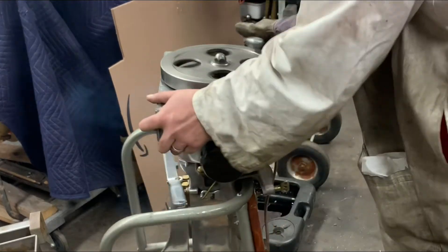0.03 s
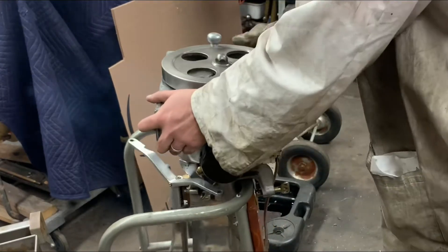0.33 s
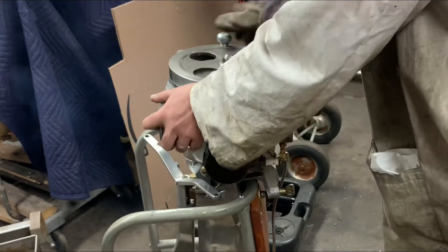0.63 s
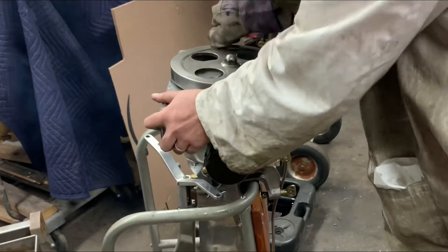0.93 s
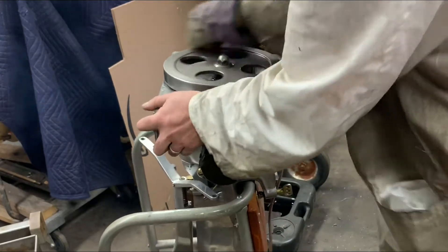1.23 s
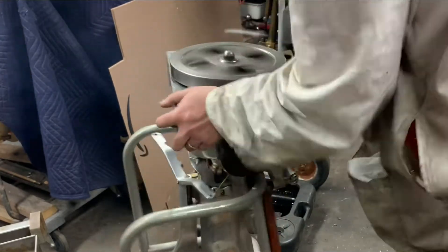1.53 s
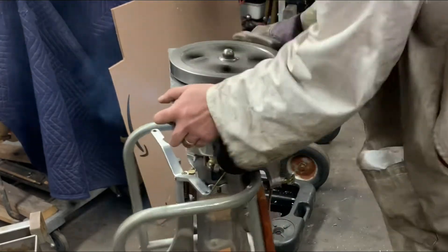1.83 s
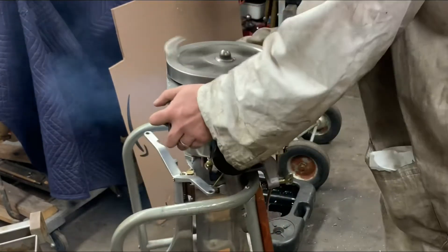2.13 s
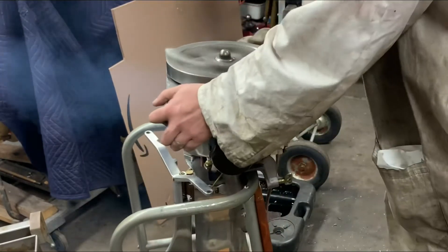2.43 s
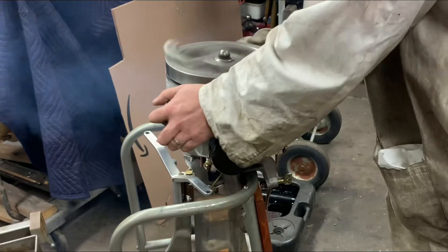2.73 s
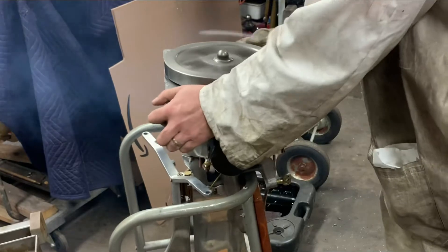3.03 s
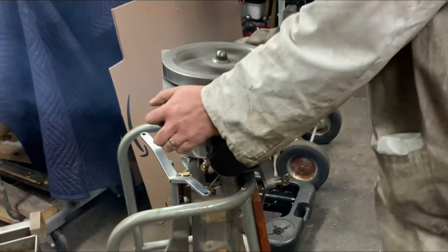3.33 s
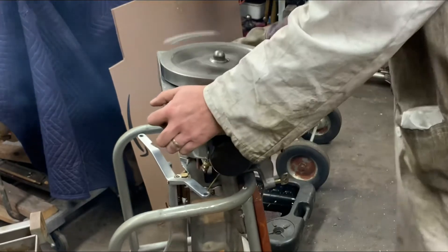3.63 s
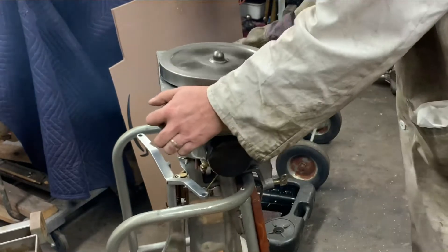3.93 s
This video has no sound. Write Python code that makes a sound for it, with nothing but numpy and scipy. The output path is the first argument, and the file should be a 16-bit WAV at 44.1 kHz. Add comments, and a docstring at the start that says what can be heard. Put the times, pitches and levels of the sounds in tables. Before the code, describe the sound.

A small old outboard engine is cranked by hand, catches and runs with sharp pops.

```python
"""Hand-starting an antique outboard.

A single-cylinder engine is rocked by hand in a workshop: air puffs through the ports, loose steel clinks,
a glove knocks on the knob. After one hard swing it catches and settles at about eleven pops a second.
Each pop is a crack of gas plus a ring of the exhaust, which echoes off near walls and booms in the room."""
import sys
import numpy as np
from scipy import signal
from scipy.fft import rfft, irfft, next_fast_len
from scipy.io import wavfile
from scipy.ndimage import uniform_filter1d, minimum_filter1d, map_coordinates

SR = 44100
rng = np.random.default_rng(int(sys.argv[2]) if len(sys.argv) > 2 else 0)


def digitize_waveform(pressure):
    """Quantize a signal to 16-bit integers and store it at the path in sys.argv[1].

    Rows of a 2-D input are taken as channels; values are limited to [-1, 1].
    """
    field = np.atleast_2d(pressure).T
    bounded = np.clip(field, -1, 1)
    quanta = np.round(bounded * 32767).astype(np.int16)
    wavfile.write(sys.argv[1], SR, quanta)


N = 4 * SR

# firings: t/s, thump/dB, bark/dB, crack/dB
FIRINGS = [(1.4579, 8.5, 0.5, 2.5), (1.6, 7.5, -3, 0.3), (1.7536, 11, 2, 3.5), (1.8798, 8.3, 0.2, 2),
           (1.9912, 7.5, -1, 2), (2.1043, 8, -1, 0.2), (2.2105, 10.5, 1.2, 0.8), (2.3133, 9, 0.5, 1.8),
           (2.417, 9, 0.7, 2), (2.5185, 9.5, 1.4, 1), (2.616, 9.5, 2, 1.8), (2.7104, 4.5, 0, 0),
           (2.803, 4, -1.1, 0), (2.8938, 4, -1, 0), (2.9836, 3.5, -1.5, 1.5), (3.073, 2, -1.5, -1),
           (3.1596, 2, -0.5, 0.5), (3.248, 3.5, 1, 0.2), (3.336, 2.5, -1, 0), (3.4217, 2, 0.5, 0),
           (3.5078, 2.5, -0.2, 0.6), (3.597, 1, -0.7, -1.5), (3.6839, 1.5, -0.5, -0.8),
           (3.7716, 2.5, -0.5, -2), (3.8595, 2, -0.5, -0.4), (3.948, 1, -1.5, -0.5)]
# warm exhaust modes: f/Hz, level/dB, t60/s, lag/s
EXHAUST_MODES = [(259, -14.5, 0.034, .004), (341, -5.5, 0.032, .003), (560, 1, 0.039, 0.0013),
                 (785, -6.5, 0.028, 0.00025), (1033, -9.5, 0.031, 0.00077), (1170, -9, 0.026, 0.0038),
                 (1456, -14.5, 0.024, 0.0012), (1650, -23, 0.039, 0.0011), (2060, -6, 0.015, 0.00022)]
# weight of thump against bark: f/Hz, share
THUMP_SHARE = [(80, 1), (130, 0.57), (330, 0.29), (550, 0.1)]
# wall echoes: delay/s, level/dB
WALL_ECHOES = [(.0072, -11), (0.0185, -13), (0.022, -18.5), (.033, -16.5), (.047, -15.5), (.058, -18)]
# exhaust reverb: f/Hz, level/dB
EXHAUST_WET = [(200, -30), (450, -12.5), (700, -6.5), (1200, -3), (1700, -0.5), (2400, 6)]
COLD_FLAT_RATIO, WARMUP_S, PORT_OPEN_S = 0.22, 0.5, 0.0029

def exhaust():
    """Each firing rings the exhaust; its pitch climbs as the gas warms, and near walls repeat it."""
    out, t = np.zeros(N), np.arange(SR // 8) / SR
    hz, db, t60, lag = np.transpose(EXHAUST_MODES)
    share = along(THUMP_SHARE, hz)
    polarity = (-1) ** np.arange(len(hz))
    age = np.maximum(t - lag[:, None], 0)
    envelopes = amp(-5 - 60 * age / t60[:, None]) * (1 - np.exp(-(age / PORT_OPEN_S) ** 2))
    for start, thump_db, bark_db, _ in FIRINGS:
        pitch = 1 - COLD_FLAT_RATIO * coldness(start) + rng.normal(0, 0.003)
        mode_db = db + share * thump_db + (1.5 - share) * bark_db + rng.normal(0, 0.58, len(hz))
        rings = envelopes * np.sin(2 * np.pi * hz[:, None] * pitch * age)
        add(out, start, (polarity * amp(mode_db)) @ rings)
    walls = lambda f: 1 + sum(amp(db) * np.exp(-2j * np.pi * f * delay) for delay, db in WALL_ECHOES)
    return filtered(out, walls) + filtered(room(out), lambda f: amp(along(EXHAUST_WET, f)))


def coldness(time_s):
    """1 at the first firing, towards 0 as the engine warms."""
    return np.exp(-(time_s - FIRINGS[0][0]) / WARMUP_S)


# standing waves: f/Hz, level/dB, t60/s, left-right/dB
ROOM_MODES = [(63.8, -5, .19, -4), (81.3, 1.5, 0.23, 1), (127.3, -1, 0.25, 3.5), (155.9, -5, 0.32, 2),
              (202.4, -8.5, 0.31, 2), (245, -8, 0.32, -7), (293, -9, 0.23, 3), (322.7, -5.5, .2, 4),
              (451.7, -2.5, 0.16, 3), (567.6, -12, 0.25, -1), (739, -17, .18, 8), (845, -14, .22, 6),
              (1009.7, -11, 0.22, -2.5), (1112, -12, 0.26, -8), (1313, -15.5, 0.25, 2)]
BOOM_DB, BOOM_RISE_S, BOOM_LAG_S = -19.5, 0.011, 0.00503

def boom():
    """Each firing drives the room's standing waves; the first, full charges thump hardest."""
    out, t = np.zeros((2, N)), np.arange(SR // 2) / SR
    hz, db, t60, pan_db = np.transpose(ROOM_MODES)
    envelopes = amp(db[:, None] - 60 * t / t60[:, None]) * (1 - np.exp(-t / BOOM_RISE_S))
    waves = envelopes * np.sin(2 * np.pi * hz[:, None] * t)
    share = along(THUMP_SHARE, hz)
    stereo_gains = (-1) ** np.arange(len(hz)) * amp(np.array([pan_db, -pan_db]) / 2)
    for start, thump_db, bark_db, _ in FIRINGS:
        drive = amp(BOOM_DB + share * (thump_db - bark_db))
        add(out, start + BOOM_LAG_S, (stereo_gains * drive) @ waves)
    return out


# port modes: f/Hz, level/dB, t60/s
PORT_MODES = [(1780, -8, 0.0046), (2891, -3.5, 0.0061), (3720, -8, 0.0062), (4780, -7.5, 0.0044),
              (6640, -7.5, 0.0066)]
SNAP_DB, SNAP_LAG_S = -11, 0.0013

def snap():
    """The steep pressure front of each firing rings the port, hard and very briefly."""
    out, t = np.zeros(N), np.arange(SR // 40) / SR
    for start, _, _, crack_db in FIRINGS:
        ring = sum(amp(db + rng.normal(0, 2.8) - 60 * t / t60) * np.sin(2 * np.pi * hz * t)
                   for hz, db, t60 in PORT_MODES)
        add(out, start + SNAP_LAG_S, amp(SNAP_DB + crack_db) * ring)
    return with_room(out, wet_db=0.5)


# spectra of the gas jet and its echo: f/Hz, level/dB
CRACK_SPECTRUM = [(300, 13), (900, 3), (2000, 3), (3500, 0), (5500, -4.5), (7000, -5.5), (8500, 3),
                  (10500, 2), (13500, -2), (15500, 0), (16500, -60)]
ECHO_SPECTRUM = [(300, -0.5), (900, -1), (1600, -3.5), (2800, 2), (4000, 4.5), (5500, 1.5), (7000, -1.5),
                 (10500, -0.5), (13500, -4.5), (15500, -2), (16500, -44)]
CRACK_DB, CRACK_RISE_S, CRACK_HOLD_S, CRACK_T60_S = -9.5, 0.0022, 0.0023, 0.023
LEAK_DB, LEAK_LEAD_S = -17, 0.0025
ECHO_DB, ECHO_DELAY_S = 10, 0.0056

def crack():
    """Gas leaks, then bursts out turbulently as the exhaust port opens; each burst has its own echo."""
    gas, jet, echo = noise(CRACK_SPECTRUM), np.zeros(N), np.zeros((2, N))
    t = np.arange(SR // 25) / SR - LEAK_LEAD_S
    release = amp(-60 * np.maximum(t - CRACK_RISE_S - CRACK_HOLD_S, 0) / CRACK_T60_S)
    blast = np.clip(t / CRACK_RISE_S, 0, 1) * release
    leak = amp(LEAK_DB) * np.clip(1 - np.abs(t) / LEAK_LEAD_S, 0, 1)
    for start, _, _, db in FIRINGS:
        turbulence = gas[round(start * SR):][:len(t)]
        add(jet, start - LEAK_LEAD_S, amp(CRACK_DB + db) * (blast + leak) * turbulence)
        add(echo, start + ECHO_DELAY_S, amp(ECHO_DB + db) * room_tail())
    return jet + filtered(echo, lambda hz: amp(along(ECHO_SPECTRUM, hz)))


# flywheel and cowl modes: f/Hz, level/dB, t60/s
FLYWHEEL_MODES = [(1415, -1.5, 0.4), (1713, -3, .45), (2152, 0.5, 0.28), (2575, 0, 0.35), (2755, -2, 0.43),
                  (2984, 1, 0.27), (3150, 1, .25), (3430, -5, .35), (3780, 0, 0.34), (4075, 0, 0.32),
                  (5071, -7, .3), (6708, -4, 0.26)]
FLYWHEEL_DB = -41.5

def flywheel():
    """Shaken by each firing, flywheel and cowl ring on between the pops."""
    out, t = np.zeros(N), np.arange(SR // 3) / SR
    for start, _, bark_db, _ in FIRINGS:
        add(out, start, amp(FLYWHEEL_DB + bark_db) * modes(FLYWHEEL_MODES, t, scatter_db=4))
    return with_room(out, wet_db=0)


# gear and intake envelope: t/s, level/dB
WHIRR_ENVELOPE = [(1.25, -83), (1.36, -36), (1.5, -32.5), (1.7, -34), (2.0, -33.5), (4, -35)]
# its spectrum: f/Hz, level/dB
WHIRR_SPECTRUM = [(60, 4), (300, 5.5), (1100, -0.5), (2500, -3), (6000, -6), (12000, -12.5), (16000, -26)]
BLOWBY_DB, BLOWBY_S = 8, 0.014

def whirr():
    """Gears and intake fill the gaps, swelling around firings as gas slips past the cold piston."""
    t = np.arange(N) / SR
    blowby = sum(coldness(start) * np.clip(1.5 - np.abs(t - start) / BLOWBY_S, 0, 1)
                 for start, *_ in FIRINGS[1:])
    return room(noise(WHIRR_SPECTRUM)) * fader(WHIRR_ENVELOPE) * amp(BLOWBY_DB * blowby)


# air puffs: t/s, rise/s, t60/s, chuff/dB, body/dB, rasp/dB, hiss/dB
PUFFS = [(0, 0.0012, 0.28, -29, -37, -32, -34.5), (.075, 0.022, 0.2, -48, -32, -34.5, -41),
         (0.173, 0.006, 0.14, -72, -35.5, -33, -65), (0.347, 0.029, 0.71, -51, -41, -39, -46.5),
         (.42, 0.014, 0.14, -55, -34, -24, -27), (0.46, 0.037, 0.31, -52, -42, -37.5, -42.5),
         (.665, .03, 0.45, -60, -59, -52, -60), (.722, 0.0072, 0.28, -54, -62, -47, -49.5),
         (1.118, 0.02, 0.21, -66, -53, -45.5, -69), (1.17, 0.024, 0.25, -68, -51, -56.5, -75),
         (1.238, 0.014, 0.66, -31.5, -48.5, -50.5, -57), (1.283, 0.029, 0.11, -33, -37, -36, -47),
         (1.31, 0.021, 0.28, -47, -39.5, -48, -37.5), (1.364, 0.017, 0.079, -48, -27, -26.5, -25),
         (1.39, 0.0645, 0.036, -54, -28.5, -25.5, -19.5)]
# spectra of the four parts of a puff: f/Hz, level/dB
CHUFF_SPECTRUM = [(25, -31.5), (50, 2), (68, 10.5), (100, -10), (200, -15), (600, -73)]
BODY_SPECTRUM = [(100, -31), (165, -11), (195, 2.5), (225, -4.5), (262, -1), (300, -16), (351, 3),
                 (390, -4), (437, 0), (520, -6.5), (750, -9.5), (1500, -35)]
RASP_SPECTRUM = [(300, -15), (700, 1.5), (1150, 5.5), (1550, 5.5), (2000, 7.5), (3000, 3.5), (5000, -3),
                 (10000, -72)]
HISS_SPECTRUM = [(1500, 3), (4000, 4), (6800, 2), (9000, -1), (12000, -4), (15500, -10), (16500, -35)]
PUFF_DB, RATTLE_DB, RATTLE_HZ = 0.5, 2.5, 160

def cranking():
    """The piston, moved by hand, pushes air through the engine's cavities while the gears rasp."""
    envelopes = np.array([burst(start, rise, t60) for start, rise, t60, *_ in PUFFS])
    chuff, body, rasp, hiss = amp(np.array(PUFFS)[:, 3:]).T @ envelopes
    flutter = map_coordinates(rng.standard_normal(N // 50), [np.arange(N) * RATTLE_HZ / SR])
    air = chuff * noise(CHUFF_SPECTRUM) + body * noise(BODY_SPECTRUM)
    air += rasp * amp(RATTLE_DB * flutter) * noise(RASP_SPECTRUM)
    air += hiss * noise(HISS_SPECTRUM)
    return amp(PUFF_DB) * with_room(air, wet_db=-6.5)


# knob and flywheel knocks: t/s, thud/dB, click/dB
KNOCKS = [(0.152, -37, -25), (0.897, -44.5, -86), (0.944, -51, -69), (1.113, -58, -59), (1.212, -43, -59),
          (1.379, -36, -25), (1.553, -48, -27), (1.568, -48, -31), (1.656, -45, -33)]
# metal click: f/Hz, level/dB
CLICK_SPECTRUM = [(1500, -1), (4000, 5), (6800, 6.5), (9000, -4), (12000, -9), (15500, -21), (16500, -40)]

def knocks():
    """Small contacts: a thud of the engine's body and a click of metal."""
    thuds = sum(amp(db) * burst(start, rise_s=0.0033, t60_s=0.11) for start, db, _ in KNOCKS)
    clicks = sum(amp(db) * burst(start, rise_s=0.0012, t60_s=0.089) for start, _, db in KNOCKS)
    return with_room(thuds * noise(BODY_SPECTRUM) + clicks * noise(CLICK_SPECTRUM), wet_db=-9)


# crank impacts: t/s, level/dB
CLUNKS = [(.085, -46), (0.366, -45), (.431, -29.5), (.74, -51), (.897, -47.5), (.965, -46.5)]
# housing modes: f/Hz, level/dB, t60/s
HOUSING_MODES = [(200, 0, 0.38), (260, -8, .45), (351.7, -8.5, 0.36), (439, -13, .45), (1092, -7.5, 0.27),
                 (1280, -15, .25), (1475, -14, .3)]
CLUNK_RISE_S = 0.0075

def clunks():
    """The rocked crank meets its play and the hollow housing rings."""
    out, t = np.zeros(N), np.arange(SR // 2) / SR
    attack = 1 - np.exp(-t / CLUNK_RISE_S)
    for start, db in CLUNKS:
        add(out, start, amp(db) * attack * modes(HOUSING_MODES, t, scatter_db=1.5))
    return with_room(out, wet_db=-12.5)


# steel contacts: t/s, level/dB, most excited f/Hz
CLINKS = [(.362, -34, 2100), (.384, -27, 2900), (.431, -45, 2000), (.69, -35, 3870), (.733, -36.5, 1880),
          (.765, -39, 3700), (0.954, -54, 1900), (.978, -48, 2000), (1.12, -52, 3500), (1.134, -41, 2100)]
# steel modes before hand damping: f/Hz, level/dB, t60/s
STEEL_MODES = [(1529, -6, .4), (1845, -4, .5), (1980, -6, .4), (2110, 0, 0.13), (2680, -3, .4),
               (2880, -5, 0.17), (3350, -9, .4), (3908, -7.5, .5), (4075, -15, .4), (5200, -27, .5)]
HAND_T60_S, FALL_DB_PER_OCT = 0.089, 10

def clinks():
    """Loose steel parts take up their play, damped by the hand; each contact favours its own modes."""
    out, t = np.zeros(N), np.arange(SR // 4) / SR
    for start, db, centre_hz in CLINKS:
        struck = [(hz, mode_db - FALL_DB_PER_OCT * abs(np.log2(hz / centre_hz)), t60)
                  for hz, mode_db, t60 in STEEL_MODES]
        add(out, start, amp(db - 60 * t / HAND_T60_S) * modes(struck, t, scatter_db=1.5))
    return with_room(out, wet_db=-5.5)


# seeping air envelope: t/s, level/dB
SEEP_ENVELOPE = [(.45, -90), (.58, -65), (.8, -66), (1.0, -68), (1.1, -73), (1.3, -88)]
# its spectrum: f/Hz, level/dB
SEEP_SPECTRUM = [(4000, -30), (8000, -8), (11000, 1), (15500, -2), (16500, -30)]

def seep():
    """Air hisses thinly past the piston while it is held against compression."""
    return noise(SEEP_SPECTRUM) * fader(SEEP_ENVELOPE)


# workshop background: f/Hz, level/dB
FLOOR_SPECTRUM = [(30, -14), (60, -2), (200, -18), (1000, -16), (4000, -28), (15000, -42)]
FLOOR_DB = -62.5

def room_tone():
    """The workshop's faint, steady rumble."""
    return amp(FLOOR_DB) * room(noise(FLOOR_SPECTRUM))


# reverb decay: f/Hz, t60/s
ROOM_T60 = [(100, 0.67), (700, 0.37), (2000, 0.37), (5000, 0.28), (13000, 0.21)]
# reverb likeness, left to right: f/Hz, coherence
ROOM_COHERENCE = [(100, 1), (500, 0.44), (1200, 0.15), (4000, 0.27), (6500, 0.18), (8000, 1), (16000, 0.94)]
ROOM_BUILD_S = 0.0035

def room_tail():
    """A fresh diffuse stereo echo of the workshop, left energy 1."""
    hz, t, spectra = signal.stft(rng.standard_normal((2, SR // 2)), SR, nperseg=256)
    decay = amp(-60 * t / along(ROOM_T60, hz)[:, None])
    width = np.arccos(along(ROOM_COHERENCE, hz)) / 2
    weights = np.array([np.cos(width), np.sin(width)])[:, :, None]
    mid, side = signal.istft(spectra * decay * weights, SR, nperseg=256)[1]
    build = 1 - np.exp(-(np.arange(len(mid)) / SR / ROOM_BUILD_S) ** 2)
    tail = np.array([mid + side, mid - side]) * build
    return tail / np.linalg.norm(tail[0])


def room(x):
    """Stereo reverb of x."""
    return signal.fftconvolve(x[None], room_tail(), axes=1)[:, :N]


def with_room(x, wet_db):
    """x plus its reverb."""
    return x + amp(wet_db) * room(x)


def modes(table, t, scatter_db):
    """Free ring of a struck part; each blow weights its modes anew."""
    return sum(amp(db + rng.normal(0, scatter_db) - 60 * t / t60)
               * np.sin(2 * np.pi * (hz * t + rng.random())) for hz, db, t60 in table)


def burst(start, rise_s, t60_s):
    """Envelope: linear rise, exponential release."""
    t = np.arange(N) / SR - start
    return np.clip(t / rise_s, 0, 1) * amp(-60 * np.clip((t - rise_s) / t60_s, 0, 3))


def fader(points):
    """Gain curve through (t/s, level/dB) points."""
    return amp(np.interp(np.arange(N) / SR, *np.transpose(points)))


def noise(spectrum):
    """Coloured noise, rms 1."""
    x = filtered(rng.standard_normal(N), lambda hz: amp(along(spectrum, hz)))
    return x / x.std()


def filtered(x, response):
    """Apply a complex frequency response."""
    size = next_fast_len(N + SR // 2)
    return irfft(rfft(x, size) * response(np.fft.rfftfreq(size, 1 / SR)), size)[..., :N]


def along(points, hz):
    """Interpolate (f/Hz, value) points over log frequency."""
    f, values = np.transpose(points)
    return np.interp(np.log(hz + 1), np.log(f + 1), values)


def add(track, start, x):
    """Mix x into the track at start seconds."""
    i = max(0, round(start * SR))
    track[..., i:i + x.shape[-1]] += x[..., :N - i]


def amp(db):
    """dB to amplitude."""
    return 10 ** (np.asarray(db) / 20)


def scene():
    """Engine and hand over the quiet of the workshop."""
    running = exhaust() + boom() + snap() + crack() + flywheel() + whirr()
    by_hand = cranking() + seep() + knocks() + clunks() + clinks()
    return running + by_hand + room_tone()


# microphone balance: f/Hz, left-right/dB
MIC_BALANCE = [(60, 0), (130, 2), (500, 1), (1100, 3.5), (2000, 0.8), (5000, -0.5), (9000, 0)]
# microphone phase, lower range and treble: f/Hz, left lead/rad
MIC_PHASE = [(0, 0.14), (150, 0.4), (600, 0.87), (1200, 1.1), (1800, 1.48), (3000, 2.32), (5000, 2.35),
             (6500, 0.17)]
MIC_TREBLE_PHASE = [(8550, -3.14), (11050, -6.28), (13500, -9.42), (16100, -12.57)]

def microphones(hz):
    """Response of two closely spaced microphones that differ in level and phase."""
    side = np.array([[0.5], [-0.5]])
    phase = np.interp(hz, *np.transpose(MIC_PHASE + MIC_TREBLE_PHASE))
    return amp(side * along(MIC_BALANCE, hz)) * np.exp(1j * side * phase)


def limiter(x, ceiling_db, hold_s):
    """Duck the highest peaks for a moment."""
    size = round(hold_s * SR)
    gain = np.minimum(1, amp(ceiling_db) / (np.abs(x).max(axis=0) + 1e-9))
    return x * uniform_filter1d(minimum_filter1d(gain, 2 * size), size)


LOW_CUT_HZ, TOP_HZ = 60.7, 16400

def record(dry):
    """Low cut, microphone pair, limiter and steep band limit."""
    low_cut = signal.butter(2, LOW_CUT_HZ, 'highpass', fs=SR, output='sos')
    stereo = filtered(signal.sosfilt(low_cut, dry), microphones)
    limited = limiter(stereo, ceiling_db=-0.5, hold_s=0.002)
    return filtered(limited, lambda hz: 1 / np.sqrt(1 + (hz / TOP_HZ) ** 160))


dry = scene()
out = record(dry)
digitize_waveform(out)
```